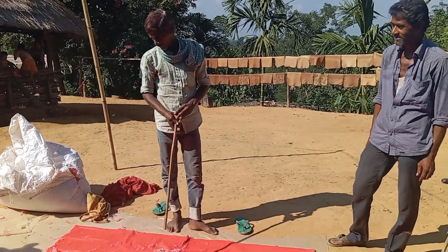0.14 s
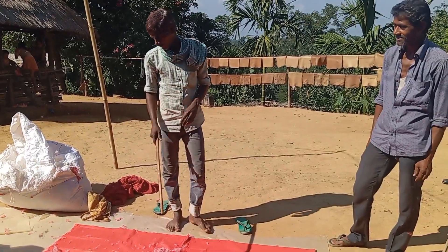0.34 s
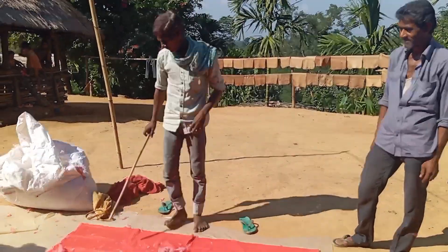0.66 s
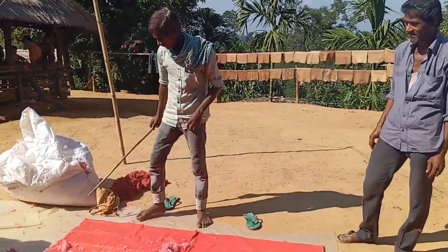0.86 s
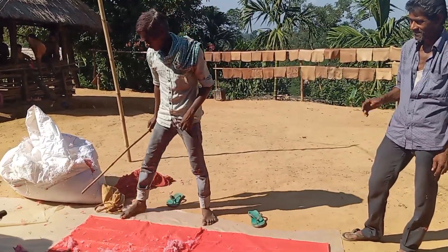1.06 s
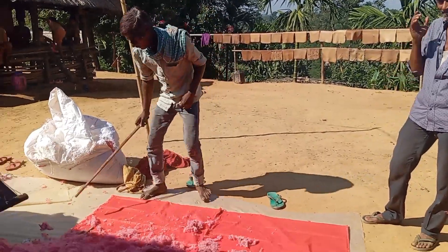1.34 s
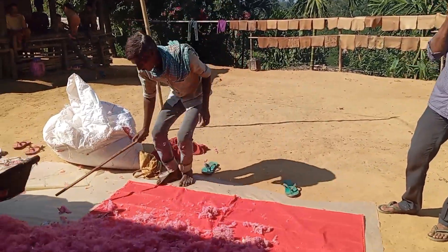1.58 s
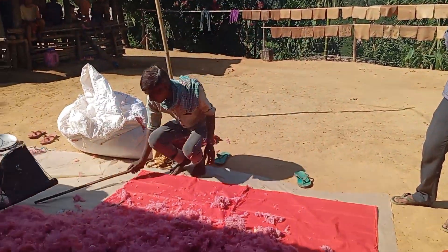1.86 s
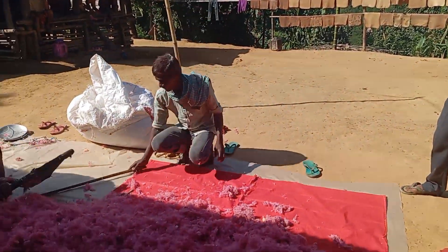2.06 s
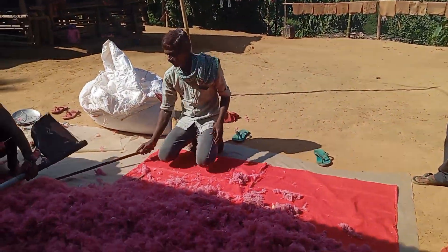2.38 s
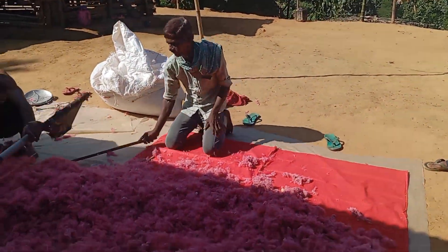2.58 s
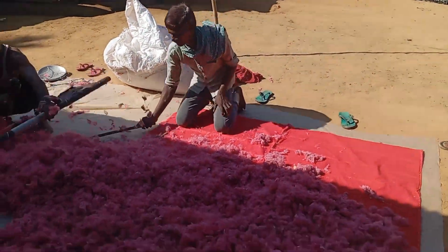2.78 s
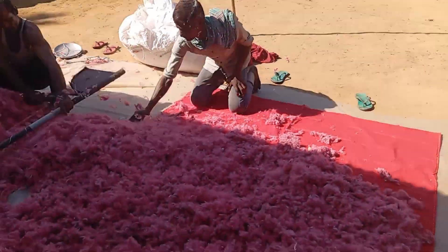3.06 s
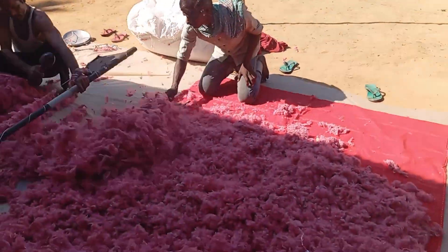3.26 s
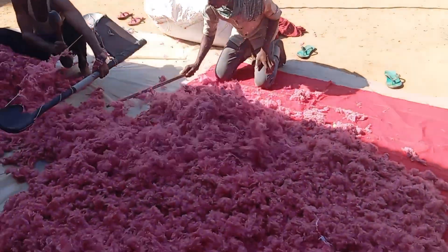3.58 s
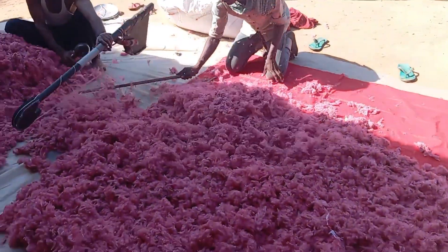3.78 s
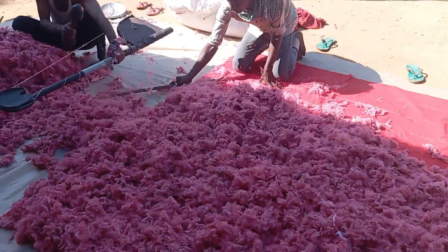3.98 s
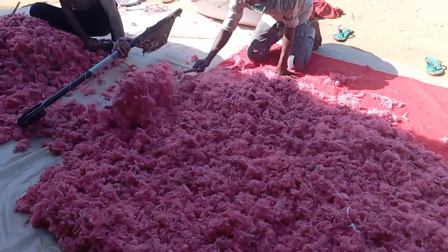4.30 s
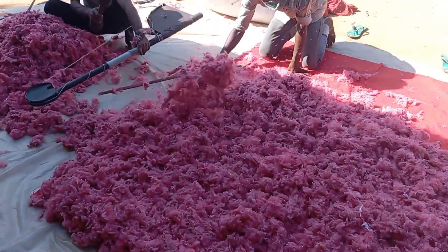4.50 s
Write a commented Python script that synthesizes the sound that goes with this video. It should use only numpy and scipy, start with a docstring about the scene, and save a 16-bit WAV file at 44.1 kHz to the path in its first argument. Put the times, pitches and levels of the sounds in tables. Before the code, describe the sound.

Steady, sharp snaps of a cotton-fluffing bow, eight in all, each with a thump and rattling string buzz, growing duller in a quiet open yard.

```python
"""A carding bow is played over a heap of loose cotton in an open yard, about two strokes a second.
Ahead of each stroke a faint low noise band rises and the mallet clicks onto the taut string, which sings as it
is drawn. Let go, the string snaps: the frame thumps, cracks and rings as damped modes, and the string buzzes on
its board, strongly when it swings free, weakly when buried in fibre. Between strokes bands of noise swish as
cotton, wood knocks and the ground thuds; as time goes on the listener moves round the bow and it sounds duller."""
import sys
import numpy as np
from scipy import signal
from scipy.fft import rfft, irfft, next_fast_len
from scipy.io import wavfile
from scipy.ndimage import uniform_filter1d, map_coordinates

SR = 44100
rng = np.random.default_rng(int(sys.argv[2]) if len(sys.argv) > 2 else 0)


def generate_wav(sig):
    """Save sig (samples, or channels by samples) to the path in sys.argv[1] as 16-bit PCM at SR."""
    pcm = np.round(np.clip(np.atleast_2d(sig).T, -1, 1) * 32767).astype(np.int16)
    wavfile.write(sys.argv[1], SR, pcm)


N = 204751
T = np.arange(SR // 2) / SR  # time within one sound [s]

# Levels of single sounds are nominal: envelopes and mixing factors act on them.
# Strokes: (time [s], crack level [dB], frame ring level [dB], first buzz level [dB],
# free swing of the string [dB], strongest frequency [Hz], note while drawn [Hz])
STROKES = [ (0.3578, -12, -29, -15.5, -23.5, 4600, 555), (0.9063, -9.5, -19.5, -28, -32, 2400, 348),
           (1.4894, -5.5, -24.5, -21.5, -25, 4620, 520), (2.0394, -8.5, -18.5, -27, -33.5, 3830, 356),
           (2.6016, -12, -15.5, -40, -26, 4500, 556), (3.1440, -9.5, -19.5, -30.5, -31.5, 3074, 333),
           (3.7180, -10.5, -17.5, -18.5, -26.5, 3430, 912), (4.2875, -8, -18.5, -26.5, -28.5, 3630, 584)]
# Natural vibrations of the bow string: (frequency [Hz], level [dB], t60 [s])
STRING_MODES = [(86.3, -6.5, 0.4), (180.6, -1.5, 0.24), (272.6, -4.5, .25), (355, -10.5, 0.26),
                (472, -15.5, 0.26), (546, -12.5, 0.23), (650, -14, 0.22), (805, -15, 0.27),
                (915, -18.5, .38), (1130, -16, .33), (1750, -16, 0.41)]
# Resonances of the wooden frame: (frequency [Hz], level [dB], t60 [s])
FRAME_MODES = [(935, -9, 0.065), (1827, -13, 0.098), (2254, -3.5, 0.023), (2523, 1.5, 0.03),
               (2894, -2.5, .05), (3484, 0.5, 0.11), (3684, 8, 0.046), (4540, -9.5, 0.034),
               (4620, 2, 0.036), (4850, -9.5, .05), (6370, -20, 0.023), (6340, -24, 0.02)]
# Spectrum of the push on the frame, also of the thuds: (frequency [Hz], level [dB])
THUMP_SPECTRUM = [(25, -34), (60, -29), (90, 1), (170, 2.5), (300, -1), (500, -10.5), (800, -11),
                  (1500, -19), (4000, -49)]
# Spectrum of the snap against the frame: (frequency [Hz], level [dB])
SNAP_SPECTRUM = [(300, -42.5), (1000, -22), (1700, -15), (2400, -1.5), (3050, -7), (3700, 0.5), (4550, 2),
                 (5300, -10), (6500, -8.5), (8000, -23), (13000, -24)]
# Spectrum of the string rattling on its board: (frequency [Hz], level [dB])
BUZZ_SPECTRUM = [(60, -40.5), (150, -9.5), (350, -8.5), (650, -13), (1400, -13.5), (2400, -1), (3000, -5.5),
                 (3750, 1), (4800, -2.5), (5500, -6.5), (6700, -11), (8200, -22.5), (13000, -32.5)]
# Contact noise of the rattle against the string's partials: (frequency [Hz], level [dB])
RASP_SPECTRUM = [(200, 0.5), (900, 10), (2500, 10.5), (6000, 11), (7500, 12)]
# Spectrum of the board's boom: (frequency [Hz], level [dB])
BOOM_SPECTRUM = [(25, -36), (55, -15), (90, -2.5), (160, -4), (400, -12), (900, -23), (2500, -58)]
# Treble slope as the listener moves round the bow: (time [s], slope [dB per octave])
BRIGHTNESS = [(0, -0.8), (2, -0.6), (3, -4.2), (4.6, -5.2)]
# Mallet catching the string: (time [s], level [dB], strongest frequency [Hz], lowest frequency [Hz], t60 [s])
CATCHES = [(0.285, -31.5, 4900, 1900, 0.055), (0.305, -28.5, 2250, 900, 0.09),
           (0.829, -24.5, 4900, 2000, 0.075), (0.852, -31, 2370, 800, 0.06), (0.86, -21, 2320, 800, 0.085),
           (1.424, -38.5, 5280, 1900, 0.09), (1.440, -31, 1580, 800, 0.1), (1.961, -32.5, 4600, 1500, 0.19),
           (1.991, -23.5, 2620, 800, 0.084), (2.494, -48, 2000, 700, 0.07), (2.527, -36.5, 1920, 700, 0.19),
           (2.561, -37.5, 2120, 700, 0.13), (3.067, -36.5, 1900, 1400, 0.28),
           (3.099, -25.5, 3270, 1100, 0.08), (3.6485, -31.5, 1750, 1500, 0.1),
           (3.671, -39, 3700, 1500, 0.1), (4.2155, -30.5, 3900, 1200, 0.11), (4.235, -32, 2620, 700, 0.08)]
# Spectrum of mallet contact, also of the knocks: (frequency [Hz], level [dB])
CLICK_SPECTRUM = [(100, -24), (400, -16.5), (1000, -1.5), (2400, 6.5), (3000, 0), (3800, 3), (5400, -4.5),
                  (7000, -24), (8500, -44.5), (13000, -44.5)]
# Soft knocks and scuffs of wood: (time [s], level [dB], pitch [Hz], t60 [s])
KNOCKS = [(1.117, -46, 1820, 0.1), (1.672, -40, 1161, 0.21), (1.672, -40, 1837, 0.17),
          (1.868, -51, 1700, 0.13), (2.517, -42.5, 736, 0.08), (2.792, -52, 900, 0.05),
          (2.817, -50.5, 865, 0.062), (2.956, -42.5, 863, 0.09), (2.997, -42, 3600, 0.11),
          (3.467, -58, 1500, 0.24), (4.11, -50.5, 750, 0.38), (4.185, -31, 1000, 0.036),
          (4.201, -39, 590, 0.072), (4.445, -37, 700, 0.022), (4.481, -44, 810, 0.08),
          (4.629, -34.5, 1680, 0.08)]
# Dull thuds on the ground: (time [s], level [dB], pitch [Hz], t60 [s])
THUDS = [(2.36, -62, 90, 0.45), (2.74, -54, 65, 0.3), (2.80, -53, 65, 0.16), (2.954, -32, 130, 0.05),
         (2.967, -30, 95, 0.045), (3.06, -51, 65, 0.4), (3.19, -41.5, 140, 0.27), (3.495, -54, 55, 0.1),
         (4.075, -46, 55, 0.13), (4.135, -50, 230, 0.3), (4.193, -32.5, 80, 0.08), (4.43, -38, 100, 0.13),
         (4.52, -56, 50, 0.55)]
# Cotton and cloth brushing past: (time of peak [s], half length [s], level [dB], centre frequency [Hz])
SWISHES = [(0.022, 0.033, -62, 5300), (0.126, 0.025, -61, 5600), (0.24, 0.025, -67, 4300),
           (0.57, 0.02, -52, 2350), (0.69, 0.03, -57, 5400), (0.785, 0.028, -54, 4300),
           (1.128, 0.0098, -49, 5500), (1.208, 0.0082, -58, 4900), (1.31, 0.015, -67, 5600),
           (1.68, .022, -48.5, 5440), (1.8, 0.07, -66, 3800), (2.81, 0.065, -54.5, 3900),
           (2.935, .05, -53.5, 3550), (3.915, 0.06, -53, 3400), (4.03, 0.03, -62, 2400),
           (4.10, 0.016, -52, 3700), (4.12, 0.016, -52, 2500), (4.43, 0.03, -53, 3570)]
# Spectrum of sliding fibre: (frequency [Hz], level [dB])
FIBRE_SPECTRUM = [(300, -21), (700, -7.5), (1400, -8), (2400, 2), (4500, -1.5), (6000, -10), (7700, -24),
                  (13000, -42.5)]
# Spectrum of the low air: (frequency [Hz], level [dB])
LOW_AIR_SPECTRUM = [(25, -27), (50, -3), (85, 5), (160, 4), (350, -20.5), (1000, -18.5), (2500, -52)]
# Reverberation of the yard: (frequency [Hz], t60 [s])
YARD_DECAY = [(100, 0.15), (1000, 0.12), (3500, 0.17), (6000, 0.14), (12000, 0.39)]
# Difference between the two sides: (frequency [Hz], level [dB])
SIDE_SPECTRUM = [(2000, -80.5), (3500, -49), (4500, -35), (6000, -19), (9000, -16), (13000, -14.5)]

# the push on the frame: nearer with time, weaker [dB per dB] when the string buzzes more
THUMP_DB, THUMP_DB_PER_S, THUMP_PER_BUZZ = -11.8, 0.35, -0.15
NOTE_DB, NOTE_GROWS = -29.5, 1.15  # the string's low note at a usual swing; growth [dB per dB of swing]
BOOM_DB, BOOM_GROWS = -36.5, 0.7  # the board's boom, likewise
USUAL_SWING_DB, FAINTEST_BUZZ_DB = -28, -52
# when the level is back up after the dip: for the faintest buzz, and how much later for a louder one
RECOVERY_S, RECOVERY_S_PER_DB = 0.043, 0.0009
# the drawn string: start ahead of the stroke, level, decay, and depth of its pitch waver
DRAW_S, DRAW_DB, DRAW_T60_S, DRAW_ROUGH = 0.05, -45, 0.25, 0.1
# height and width of a swish's band; how far it lies above, then below its centre [octaves]
SWISH_PEAK_DB, SWISH_OCTAVES, SWISH_GLIDE_OCT = 15, 0.2, 0.1
RUSTLE_DB = -73  # the heap of cotton at rest
LOW_AIR_DB, LOW_AIR_DB_PER_S = -79, 1.8  # low air, growing as the listener comes closer
NOISE_BAND_DB, NOISE_BAND_HZ = -77, 330  # faint steady noise band
# the noise band rises briefly before each stroke, less and less
RISE_DB, RISE_DB_PER_S, RISE_AHEAD_S, RISE_HALF_S = -65, -2.4, 0.13, 0.085
TOP_HZ = 13150  # upper band limit


def bow():
    """Impulsive excitation: each release pushes, cracks, rings and buzzes; a freer swing gives more note and boom."""
    out, thump = np.zeros(N), push(THUMP_SPECTRUM)
    for s, crack_db, ring_db, buzz_db, swing_db, strong_hz, _ in STROKES:
        colour = lambda hz: tilt(hz, s)
        struck = lambda hz: colour(hz) + 5 * hump(hz, strong_hz, 0.14)
        freer_db = swing_db - USUAL_SWING_DB
        louder_db = buzz_db - FAINTEST_BUZZ_DB
        thump_db = THUMP_DB + THUMP_DB_PER_S * s + THUMP_PER_BUZZ * louder_db
        recovery_s = RECOVERY_S + RECOVERY_S_PER_DB * louder_db
        boom = fade(0.33, .004) * coloured(white(), lambda hz: along(BOOM_SPECTRUM, hz))
        add(out, s + .0004, amp(thump_db) * thump + amp(BOOM_DB + BOOM_GROWS * freer_db) * boom)
        add(out, s, snap(crack_db, ring_db, struck))
        add(out, s + .003, amp(ring_db) * frame_ring(struck))
        add(out, s, buzz(buzz_db, swing_db, recovery_s, colour))
        add(out, s, amp(swing_db - 7) * after_ring())
        add(out, s, amp(NOTE_DB + NOTE_GROWS * freer_db) * twang())
    return out


def push(spectrum):
    """Minimum phase: folding the cepstrum gives the causal pulse of this spectrum, here at peak 1."""
    log_spectrum = np.log(amp(along(spectrum, np.fft.rfftfreq(len(T), 1 / SR))))
    cepstrum = irfft(log_spectrum, len(T))
    causal = (T > 0) & (T < T[-1] / 2)
    pulse = irfft(np.exp(rfft(2 * cepstrum * causal)), len(T))
    return pulse / np.abs(pulse).max()


def snap(crack_db, ring_db, colour):
    """Repeated impact: the released string slams onto the board, bounces once and leaves it chattering."""
    slam = amp(crack_db) * np.exp(-((T - 0.0033) / 0.00063) ** 2 / 2)
    rebound = amp(-6) * np.exp(-((T - .0115) / .0025) ** 2 / 2)
    chatter = amp(ring_db) * np.hypot(2.4 * fade(0.065, .0027), rebound)
    shape = np.hypot(slam, chatter)
    burst = shape * coloured(white(), lambda hz: along(SNAP_SPECTRUM, hz) + colour(hz))
    return burst * np.linalg.norm(shape) / np.linalg.norm(burst)  # the energy of the envelope


def frame_ring(colour):
    """Modal superposition: damped frame modes at unit power, with new strengths for every contact."""
    hz, db, t60 = np.transpose(FRAME_MODES)[:, :, None]
    size, detune, phase = rng.standard_normal((3, len(hz), 1))
    gain = amp(db + colour(hz) + 2 * size)
    modes = gain * fade(t60, 0.00042) * np.sin(2 * np.pi * (hz * (1 + 0.017 * detune) * T + phase))
    return modes.sum(0) / np.sqrt(np.sum(gain ** 2) / 2)


def buzz(first_db, later_db, recovery_s, colour):
    """Intermittent contact: string on board; the level dips after the hit, rises again, then decays, treble faster."""
    spectrum = lambda hz: along(BUZZ_SPECTRUM, hz) + colour(hz)
    tone = filtered(string_partials(), lambda hz: amp(spectrum(hz)))
    rasp = filtered(white() * grit(2.6), lambda hz: amp(spectrum(hz) + along(RASP_SPECTRUM, hz)))
    rattle = unit(tone + rasp)
    before, after = np.minimum(T - recovery_s, 0), np.maximum(T - recovery_s, 0)
    treble = filtered(rattle, lambda hz: 1 - 1 / (1 + (hz / 6500) ** 8))
    rattle = rattle - treble * (1 - amp(-60 * after / 0.54))  # extra decay of the treble
    first = amp(first_db) * fade(0.28, 0.0011)
    later = amp(later_db) * np.exp(-(before / 0.027) ** 2) * amp(-60 * after / 0.21)
    return np.hypot(first, later) * rattle


def string_partials():
    """Stiffness makes a string inharmonic: many upper partials, stretched in pitch and uneven in strength."""
    pitch_hz, stiffness = 91, .00002
    k = np.arange(2, 72)[:, None]
    size, phase = rng.standard_normal((2, len(k), 1))
    hz = pitch_hz * k * np.sqrt(1 + stiffness * k ** 2) * (1 + .004 * rng.standard_normal())
    return unit((amp(4 * size) * np.sin(2 * np.pi * (hz * T + phase))).sum(0))


def after_ring():
    """Resonant filtering: the dying string keeps feeding the frame's resonances."""
    power = lambda hz: sum(amp(2 * db) * hump(hz, centre, 0.025) ** 2 for centre, db, _ in FRAME_MODES)
    return fade(0.38, 0.06) * coloured(white(), lambda hz: 10 * np.log10(power(hz)))


def twang():
    """Free vibration: the string's low partials decay separately, at new strengths for each pluck."""
    hz, db, t60 = np.transpose(STRING_MODES)[:, :, None]
    size, detune, phase = rng.standard_normal((3, len(STRING_MODES), 1))
    wave = np.sin(2 * np.pi * (hz * (1 + 0.0034 * detune) * T + phase))
    return (amp(db + 0.5 * size) * fade(t60, .004) * wave).sum(0)


def mallet():
    """Contact friction: the mallet ticks and scrapes in grains as it hooks the string, which sings while drawn."""
    out = np.zeros(N)
    for s, db, strong_hz, lowest_hz, t60 in CATCHES:
        thin = lambda hz: -10 * np.log10(1 + (lowest_hz / (hz + 1)) ** 4)  # bass cut
        bright = lambda hz: 1.5 * treble_octaves(hz)
        colour = lambda hz: 10 * hump(hz, strong_hz, 0.07) + thin(hz) + tilt(hz, s) + bright(hz)
        scrape = coloured(white() * grit(3), lambda hz: along(CLICK_SPECTRUM, hz) + colour(hz))
        contact = (1.15 * fade(t60, .003) + amp(-1) * fade(.025, .003)) * scrape  # scrape, with a short tick
        add(out, s - .001, amp(db) * contact)
        add(out, s + .001, amp(db - 6) * frame_ring(colour))
    for s, *_, note_hz in STROKES:
        waver = 1 + DRAW_ROUGH * (grit(3) - 1)
        note = np.sin(2 * np.pi * note_hz * np.cumsum(waver) / SR)
        add(out, s - DRAW_S, amp(DRAW_DB) * fade(DRAW_T60_S, 0.0053) * note)
    return out


def knocks():
    """Damped resonance: each dull wooden contact is a short note in a puff of noise."""
    out = np.zeros(N)
    for s, db, pitch_hz, t60 in KNOCKS:
        puff = coloured(white(), lambda hz: along(CLICK_SPECTRUM, hz) + 26 * hump(hz, pitch_hz, 0.62))
        note = np.sin(2 * np.pi * pitch_hz * T)
        wood = 0.75 * fade(t60, .001) * puff + 0.9 * fade(0.64 * t60, .0005) * note
        add(out, s, amp(db) * wood)
    return out


def thuds():
    """Heavily damped impact: soft weights on packed earth give decaying noise in a broad low band."""
    out = np.zeros(N)
    for s, db, pitch_hz, t60 in THUDS:
        ground = coloured(white(), lambda hz: along(THUMP_SPECTRUM, hz) + 16 * hump(hz, pitch_hz, 0.96))
        add(out, s, amp(db) * fade(t60, .005) * ground)
    return out


def swishes():
    """Friction noise: brushing fibre hisses in a narrow band that glides slightly downward."""
    out, now = np.zeros(N), np.arange(N) / SR
    for peak, half, db, centre_hz in SWISHES:
        strands = patchy(depth_db=5.5)
        fibre = lambda hz: along(FIBRE_SPECTRUM, hz) + tilt(hz, peak)
        ridge = lambda hz, octaves: SWISH_PEAK_DB * hump(hz, centre_hz * 2 ** octaves, SWISH_OCTAVES)
        band = lambda octaves: coloured(strands, lambda hz: fibre(hz) + ridge(hz, octaves))
        late = (1 + np.tanh((now - peak) / half)) / 2
        gliding = (1 - late) * band(SWISH_GLIDE_OCT) + late * band(-SWISH_GLIDE_OCT)
        out += amp(db) * bell(peak, half) * gliding
    return out


def background():
    """Filtered noise: faint rustle, growing low air and a faint band that rises briefly before each stroke."""
    now = np.arange(N) / SR
    rustle = coloured(patchy(depth_db=3.5), lambda hz: along(FIBRE_SPECTRUM, hz))
    low_air = coloured(patchy(depth_db=3), lambda hz: along(LOW_AIR_SPECTRUM, hz))
    noise_band = unit(filtered(patchy(depth_db=2.5), lambda hz: hump(hz, NOISE_BAND_HZ, .5)))
    rise = np.zeros(N)
    for s, *_ in STROKES:
        rise += amp(RISE_DB + RISE_DB_PER_S * s) * bell(s - RISE_AHEAD_S, RISE_HALF_S)
    low_air_gain = amp(LOW_AIR_DB + LOW_AIR_DB_PER_S * now)
    return amp(RUSTLE_DB) * rustle + low_air_gain * low_air + np.hypot(amp(NOISE_BAND_DB), rise) * noise_band


def yard(x):
    """Reverberation: sheds and trees return a faint tail, as noise with a decay set by frequency."""
    hz, t, z = signal.stft(white(), SR, nperseg=256)
    decay = amp(-60 * t / along(YARD_DECAY, hz)[:, None])
    tail = signal.istft(z * decay, SR, nperseg=256)[1]
    delayed = np.pad(x, (SR // 100, 0))  # 10 ms
    return signal.fftconvolve(delayed, tail / np.linalg.norm(tail))[:N]


def amp(db):
    """Logarithmic level: decibels to an amplitude ratio."""
    return 10 ** (np.asarray(db) / 20)


def unit(x):
    """Normalization: x at rms 1."""
    return x / np.sqrt(np.mean(x ** 2) + 1e-20)


def along(points, hz):
    """Logarithmic frequency scale: values interpolated between (frequency, value) points."""
    f, v = np.transpose(points)
    return np.interp(np.log(hz + 1), np.log(f), v)


def filtered(x, gain):
    """Linear filtering: the spectrum of x times a gain that depends on frequency."""
    size = next_fast_len(x.shape[-1] + 8192)  # room for the filter's tail
    spectrum = rfft(x, size) * gain(np.fft.rfftfreq(size, 1 / SR))
    return irfft(spectrum, size)[..., :x.shape[-1]]


def coloured(x, level_db):
    """Spectral shaping: x filtered by level_db(frequency), at rms 1."""
    return unit(filtered(x, lambda hz: amp(level_db(hz))))


def hump(hz, centre_hz, octaves):
    """Resonance curve: a bump of height 1."""
    return 1 / (1 + (np.log2((hz + 1) / centre_hz) / octaves) ** 2)


def treble_octaves(hz):
    """Pitch interval: octaves from 3500 Hz, held constant outside 1500 to 7000 Hz."""
    return np.log2(np.clip(hz, 1500, 7000) / 3500)


def tilt(hz, s):
    """Directivity: the treble slope's gain [dB] at time s as the listener moves round the bow."""
    return np.interp(s, *np.transpose(BRIGHTNESS)) * treble_octaves(hz)


def white():
    """White noise: equal power at all frequencies, fresh for each sound."""
    return rng.standard_normal(len(T))


def grit(depth_db):
    """Amplitude modulation: random swings of level a few milliseconds long."""
    return unit(amp(depth_db * map_coordinates(rng.standard_normal(210), [T * 400])))


def patchy(depth_db):
    """Spectral fluctuation: noise whose narrow bands come and go."""
    z = signal.stft(rng.standard_normal(N), nperseg=512)[2]
    field = uniform_filter1d(rng.standard_normal(z.shape), size=3, axis=0)  # across frequency
    field = uniform_filter1d(field, size=16, axis=1)  # along time
    return signal.istft(z * amp(depth_db * unit(field)), nperseg=512)[1][:N]


def fade(t60, attack):
    """Exponential damping: a quick rise and a decay of 60 dB in t60."""
    return amp(-60 * T / t60) * (1 - np.exp(-T / attack))


def bell(peak, half):
    """Gaussian envelope: a smooth rise and fall of height 1 around the time peak."""
    return np.exp(-((np.arange(N) / SR - peak) / half) ** 2 / 2)


def add(track, s, sound):
    """Superposition: mix a sound into the track at time s."""
    part = track[max(round(s * SR), 0):][:len(sound)]
    part += sound[:len(part)]


def scene():
    """Decorrelation: everything sits in the middle; only the treble spreads a little."""
    near = bow() + mallet() + knocks() + thuds()
    mid = near + amp(-40.5) * yard(near) + swishes() + background()
    scatter = white() * fade(.015, .001)
    diffuse = signal.fftconvolve(mid, scatter / np.linalg.norm(scatter))[:N]
    side = filtered(diffuse, lambda hz: amp(along(SIDE_SPECTRUM, hz)))
    return np.array([mid + side, mid - side])


def record(dry):
    """Saturation and band limiting: the highest peaks are rounded, then a steep low-pass cuts the top."""
    rounded = dry / (1 + np.abs(dry / .95) ** 6) ** (1 / 6)
    return filtered(rounded, lambda hz: 1 / (1 + (hz / TOP_HZ) ** 80))


dry = scene()
out = record(dry)
generate_wav(out)
```